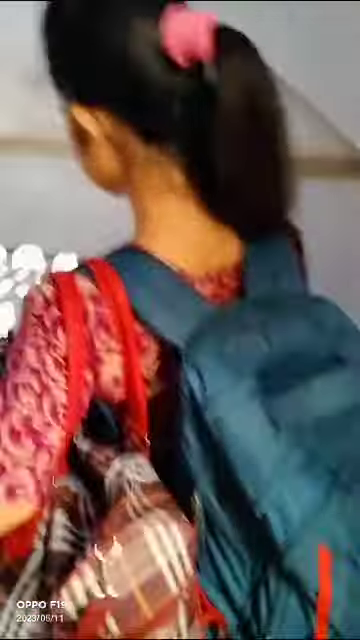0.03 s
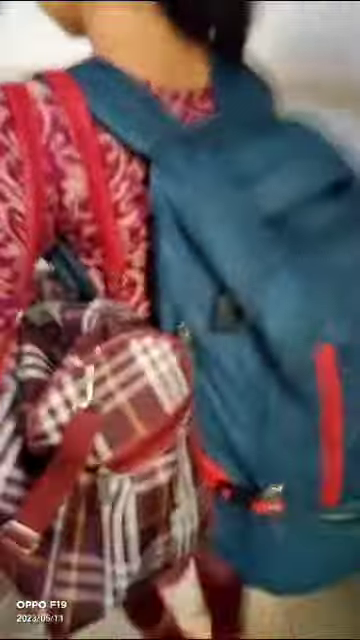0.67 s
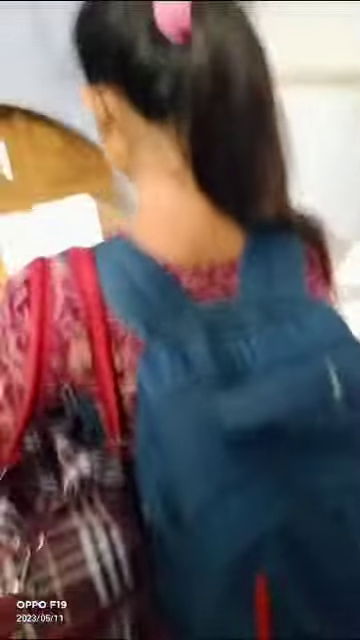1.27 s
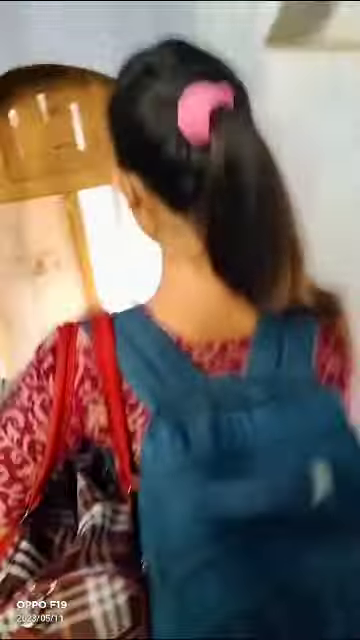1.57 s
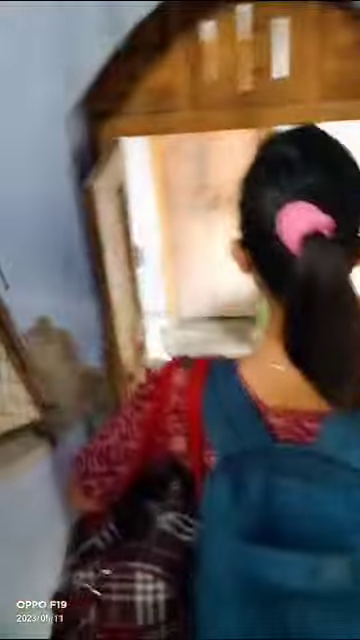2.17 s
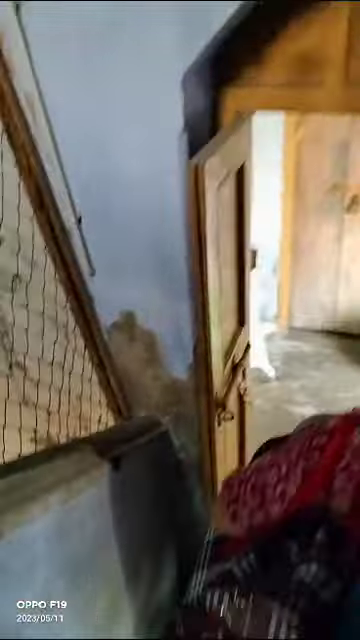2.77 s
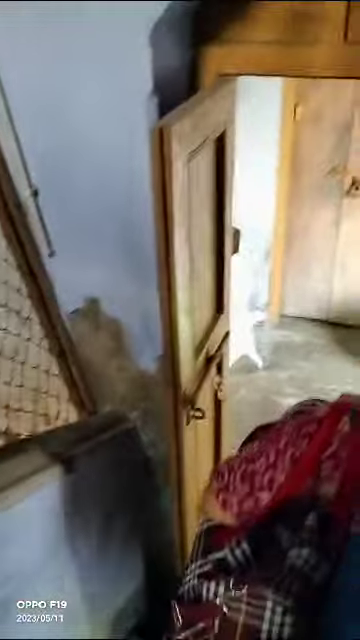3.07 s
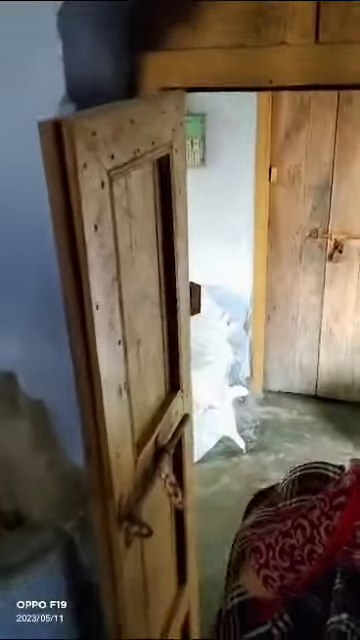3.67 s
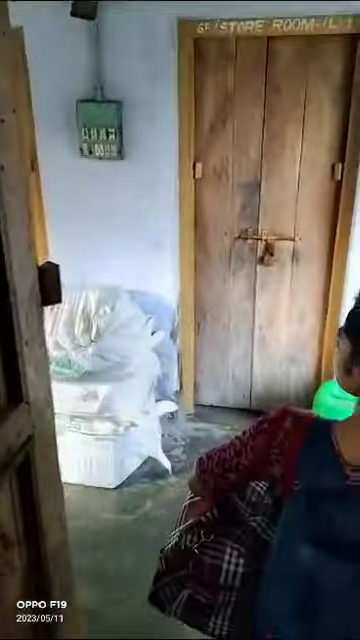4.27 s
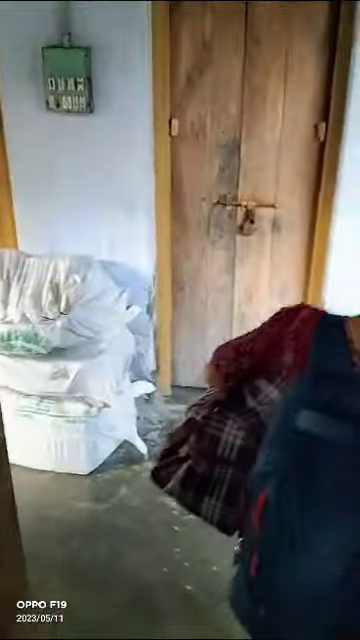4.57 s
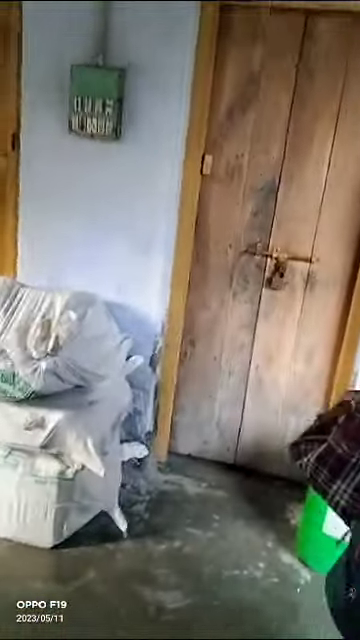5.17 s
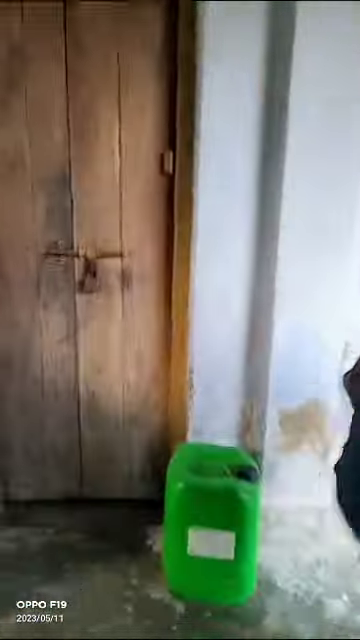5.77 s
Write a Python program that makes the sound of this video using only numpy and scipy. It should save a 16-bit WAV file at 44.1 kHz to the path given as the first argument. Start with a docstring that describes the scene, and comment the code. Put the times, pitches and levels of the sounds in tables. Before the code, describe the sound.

Footsteps of several people in flat sandals ring along a bare corridor, with hollow clops, gritty scrapes and nylon rustling close by.

```python
"""Heels knock on concrete as a few people in flat sandals walk along a bare plastered corridor.
Loose soles slap, some landings give a hollow clop, grit scuffs underfoot, and the walls ring on.
Close to the hand-held microphone, nylon clothes and bags rustle and the hand gives an odd bump.
Faint chirps, a brief hum and one soft swish sit over the low air of the building."""
import sys
import numpy as np
from scipy import signal
from scipy.fft import rfft, irfft, next_fast_len
from scipy.io import wavfile
from scipy.ndimage import uniform_filter1d

SR = 44100
rng = np.random.default_rng(int(sys.argv[2]) if len(sys.argv) > 2 else 0)


def store_pcm(level_fs):
    """Save levels as 16-bit WAV."""
    pcm = np.round(np.clip(level_fs, -1, 1) * 32767).astype(np.int16)
    wavfile.write(sys.argv[1], SR, np.atleast_2d(pcm).T)


N = 265173
TIME = np.arange(N) / SR
CONTACT = 2 ** 15   # samples in one contact and its echo
LOCAL = TIME[:CONTACT]
# echo at the microphone, thinning as the walkers leave by the doorway: t/s, level/dB
ECHO_DB = [(0, -2.5), (1.3, -2.5), (2.15, -1.5), (2.7, -8), (3.4, -8), (4.4, -7), (6, -10)]


def from_db(db):
    """Decibels to gain."""
    return 10 ** (np.asarray(db) / 20)


def rms_one(x):
    """Scale to unit rms."""
    return x / np.sqrt(np.mean(x ** 2) + 1e-20)


def along(curve, s):
    """Read a curve at a time."""
    return np.interp(s, *np.transpose(curve))


def at_hz(points, hz):
    """Read a table on a log-frequency axis."""
    f, value = np.transpose(points)
    return np.interp(np.log(hz + 1), np.log(f), value)


def bins(size):
    """Frequencies of a spectrum."""
    return np.arange(size // 2 + 1) * SR / size


def add(out, s, x):
    """Mix a sound in at a time."""
    i = max(0, round(s * SR))
    out[i:i + len(x)] += x[:max(0, N - i)]


def colour(x, gain_db):
    """Causal (minimum-phase) filter with the given gain in each bin."""
    cepstrum = irfft(np.log(from_db(gain_db)), len(x))
    cepstrum[1:len(x) // 2] *= 2
    cepstrum[len(x) // 2 + 1:] = 0
    return irfft(rfft(x) * np.exp(rfft(cepstrum)), len(x))


def shaped(x, spectrum):
    """Give a long noise a spectrum; rms 1."""
    size = next_fast_len(N)
    return rms_one(irfft(rfft(x, size) * from_db(at_hz(spectrum, bins(size))), size)[:N])


def grains(size, spread_db):
    """Noise whose samples differ widely in size, like grit."""
    noise = rng.standard_normal(size)
    return rms_one(noise * from_db(spread_db * np.clip(rng.standard_normal(size), -2, 2)))


def clumped(spread_db, clump_db):
    """Grains that come in bunches a few milliseconds long."""
    bunches = rms_one(uniform_filter1d(rng.standard_normal(N), size=180))
    return grains(N, spread_db) * from_db(clump_db * np.clip(bunches, -2, 2))


def narrow(hz, width_hz):
    """Noise in a narrow band about a steady or moving pitch; rms 1."""
    slow = signal.butter(2, width_hz / 2, fs=SR, output="sos")
    wobble = signal.sosfilt(slow, rng.standard_normal((2, N)))
    phase = 2 * np.pi * np.cumsum(hz * np.ones(N)) / SR
    return rms_one(wobble[0] * np.cos(phase) + wobble[1] * np.sin(phase))


def decay(t60):
    """A level that falls 60 dB in t60 seconds."""
    return np.exp(-np.log(1000) * LOCAL / t60)


def swell(s, db, half_s):
    """A bell-shaped rise and fall of level."""
    return from_db(db) * np.exp(-((TIME - s) / half_s) ** 2)


def stroke(since, db, fade_s, rise_share):
    """Level of a rub that swells and then dies away; a slow rub also swells slowly."""
    return from_db(db) * np.exp(-np.where(since < 0, (since / (rise_share * fade_s)) ** 2, since / fade_s))


def flex(hz):
    """A sole bends differently each time: new resonances, wider and shallower in the treble (dB)."""
    knots_hz = np.arange(0, 150, 1.2) ** 2
    depth_db = at_hz([(1200, 4.8), (3500, 3.6)], hz)
    return depth_db * np.interp(hz, knots_hz, np.clip(rng.standard_normal(len(knots_hz)), -1.7, 1.6))


def corridor(lump_db=0.5, build_s=0.0034):
    """The corridor heard from one spot: wall echoes merge into a tail, the bass lasting longest."""
    # what the plaster gives back: f/Hz, level/dB
    walls = [(150, 5), (400, -0.5), (1100, 4), (3000, 1), (5500, 2), (8000, -3.5), (14000, 6)]
    # reverberation time: f/Hz, t60/s
    ring_times = [(200, 0.84), (600, 0.53), (1300, 0.35), (3200, 0.33), (5500, 0.28), (8000, 0.38),
                  (14000, 0.23)]
    hz = bins(CONTACT)
    lumps = np.repeat(rng.standard_normal(CONTACT // 32), 32)
    echoes = from_db(lump_db * np.clip(lumps - .4, -2, 1.6) * np.exp(-LOCAL / 0.032))
    spectrum = rfft(rng.standard_normal(CONTACT) * echoes) * from_db(at_hz(walls, hz))
    centres, t60s = np.transpose(ring_times)
    tail = 0
    for share, t60 in zip(np.eye(len(centres)), t60s):
        band = irfft(spectrum * at_hz(np.c_[centres, share], hz))
        tail = tail + band * decay(t60)
    return tail * (1 - np.exp(-LOCAL / build_s))


def standing_waves(x, trim_db=-1.5):
    """The corridor lifts a fixed set of pitches."""
    # resonances between the walls: f/Hz, width/Hz, lift/dB
    room_modes = [(138, 18, 3), (205, 35, 3), (254, 36, 4), (385, 26, 6), (480, 40, 6), (640, 50, 3),
                  (760, 60, 3), (1165, 50, 4), (2920, 90, 3), (3473, 70, 3), (4050, 300, 3), (5134, 110, 4),
                  (6692, 190, 3)]
    size = next_fast_len(N + CONTACT, real=True) * 2
    lift_db = sum(db / (1 + (2 * (bins(size) - hz) / width) ** 2) for hz, width, db in room_modes)
    return colour(np.pad(x, (0, size - N)), lift_db + trim_db)[:N]


def sole(level_db, tint_db, wet_db, smack_db, crack_db, early_db, crack_s, early_s):
    """A sole smacks, crackles as its edges close, echoes off floor and legs, then fills the corridor."""
    # a sole on concrete: f/Hz, level/dB
    spectrum = [(80, -36), (150, -15), (250, -8), (650, -5.5), (1150, -4), (1900, -4), (2900, 0.5),
                (3900, -2.5), (4700, -8), (7000, -13), (8200, -18), (9200, -36.5), (12000, -39.5),
                (15500, -48)]
    # where the body, knock, slap and snap of tint_db lie: f/Hz
    tint_hz = [330, 1100, 3700, 7000]
    hz = bins(CONTACT)
    tint = at_hz(np.c_[tint_hz, tint_db], hz) * np.minimum(hz / 200, 1)
    gain_db = at_hz(spectrum, hz) + tint + flex(hz)
    gain_db -= 10 * np.log10(np.mean(from_db(gain_db) ** 2))
    # a light touch rolls on to the floor, so less of it arrives in the first smack
    firm_db, softening = -24, 0.35
    flatness = from_db(softening * min(level_db - firm_db, 0))
    smack = flatness * from_db(smack_db) * rms_one(signal.unit_impulse(CONTACT, round(.0006 * SR)))
    crack = flatness * from_db(crack_db) * rms_one(rng.standard_normal(CONTACT) * np.exp(-LOCAL / crack_s))
    early_echoes = grains(CONTACT, spread_db=9) * LOCAL * np.exp(-2 * LOCAL / early_s)
    early = from_db(early_db) * rms_one(early_echoes)
    blow = np.sqrt(.01 * SR / CONTACT)   # scales unit rms to the energy of 10 ms
    contact = blow * (smack + crack + early) + from_db(wet_db) * corridor()
    return from_db(level_db) * colour(contact, gain_db)


def footfalls(usual_db=-40.5, firm_db=-39, hollow_db=12.5, toe_lag_s=0.059, clear_s=.09):
    """Heels knock on the concrete; the forefoot follows a firm landing that the next does not crowd."""
    # heels landing: t/s, level/dB, hollow knock/dB, snap/dB
    heels = [(0.0, -46, 9, -6), (0.059, -54, -6, -4), (0.3775, -38.5, 11, -2), (0.4574, -40.5, -1, -30),
             (0.5562, -47.5, 20, 10), (1.046, -39.5, 5, 5.5), (1.0634, -38.5, 7, -7), (1.5351, -34, 3, 2),
             (1.703, -46.5, 11, -8), (2.1096, -36, 16, -4), (2.1425, -36.5, 11, 1.5),
             (2.3008, -49.5, 0, -3), (2.352, -51, 19, 14), (2.4042, -57.5, -26, 5), (2.638, -43.5, -2, 5.5),
             (2.6499, -33, 19.5, -38), (2.6606, -37.5, 3, -26), (2.7124, -38, 8.5, -35),
             (2.8289, -52.5, 11, 10), (3.2445, -39.5, 14, 12.5), (3.338, -41.5, 3, 6),
             (3.365, -38.5, 4.5, 0), (3.412, -35.5, 12.5, -7), (3.8624, -38, 8.5, -2.5),
             (3.8743, -37.5, 7, -1.5), (3.8973, -38.5, -6, -8), (3.934, -36.5, 30.5, 11),
             (4.1494, -46.5, 6.5, -11), (4.3506, -46.5, 8.5, -2), (4.3781, -41, 12.5, -23),
             (4.4296, -38, 30, -2.5), (4.472, -45, 13, 2), (4.6018, -50.5, 13.5, 11), (4.732, -52.5, 9, 1),
             (5.0738, -37.5, 14, 3), (5.0773, -32, 16, -3.5), (5.5648, -36.5, 2, -4),
             (5.5726, -25.5, 11, -1.5), (5.835, -45, 12, 9.5)]
    out = np.zeros(N)
    lags = toe_lag_s * (1 + 0.1 * rng.uniform(-0.83, 1, len(heels)))
    gaps = np.diff(np.array(heels)[:, 0], append=np.inf)
    for (s, level_db, knock_db, snap_db), lag, gap in zip(heels, lags, gaps):
        # hollow and gentle landings have more body
        body_db = -3.5 + 0.74 * knock_db - 0.76 * (level_db - usual_db)
        # a very hollow knock sends less into the room
        wet_db = 0.62 + along(ECHO_DB, s) - 0.48 * max(knock_db - hollow_db, 0)
        smack_db = -3 - 0.55 * wet_db   # a heel heard mostly by its echo has little first smack
        touches = [(s, level_db, snap_db)]
        if level_db > firm_db and gap > clear_s:
            touches.append((s + lag, level_db - 14, snap_db - 3))   # forefoot: softer and duller
        for when, touch_db, edge_db in touches:
            add(out, when, sole(touch_db, [body_db, knock_db, 0, edge_db], wet_db, smack_db,
                                crack_db=-1.3, early_db=-2.5, crack_s=0.00024, early_s=0.0098))
    return out


def building_air():
    """Room tone all round the microphone: a low rush that drifts in level."""
    # air of the building: f/Hz, level/dB
    spectrum = [(80, -1.5), (150, -3), (250, 2), (480, 0.5), (700, -0.5), (1150, -0.5), (1900, -7),
                (2900, -6.5), (3900, -7), (4700, -10.5), (7300, -16), (9400, -34), (12000, -35.5),
                (15500, -32)]
    # its drift: t/s, level/dB
    drift = [(0, -60.5), (.8, -63), (1.35, -63), (1.8, -58), (2.5, -63.5), (2.95, -66), (3.5, -60.5),
             (4.2, -63), (5.45, -64), (6, -58)]
    rumble_cut = signal.butter(2, 40, "high", fs=SR, output="sos")
    air = signal.sosfilt(rumble_cut, shaped(rng.standard_normal(N), spectrum))
    return air * from_db(along(drift, TIME))


def sandal_slaps():
    """A loose sandal slaps once a stride: thin, sharp cracks that set the corridor ringing."""
    # slaps about 0.54 s apart: t/s, level/dB, body/dB, knock/dB, snap/dB, echo/dB
    slaps = [(0.4039, -33.5, 0.5, -10.5, 2.5, 0), (0.9157, -32, -5.5, -8, 2, -0.5),
             (1.4531, -37, -7.5, -5.5, -2.5, 1), (2.023, -31.5, -3.5, -9, 2, 0.5),
             (2.526, -36, -5.5, -9.5, -5.5, -2), (3.0641, -31, -14, -7.5, -4, 0.5),
             (3.6368, -30, -13.5, -11, -2, -4.5)]
    out = np.zeros(N)
    for s, level_db, body_db, knock_db, snap_db, wet_db in slaps:
        add(out, s, sole(level_db, [body_db, knock_db, 0, snap_db], wet_db,
                         smack_db=1, crack_db=-1.5, early_db=-5.5, crack_s=.0004, early_s=.009))
    return out


def microphone_bumps(swell_s=0.0036, lag_s=0.0094):
    """Handling noise: a jolt of the hand gives a cycle or two of deep thud."""
    # jolts on the microphone: t/s, level/dB, f/Hz
    jolts = [(.41, -52, 70), (1.684, -49, 121), (1.921, -52.5, 79.6), (2.015, -54, 85), (2.694, -38.5, 61),
             (4.561, -50.5, 63), (5.057, -46.5, 94)]
    out = np.zeros(N)
    envelope = (LOCAL / swell_s / 2) ** 2 * np.exp(2 - LOCAL / swell_s)
    for s, db, hz in jolts:
        add(out, s + lag_s, from_db(db) * envelope * np.sin(2 * np.pi * hz * LOCAL))
    return out


def chirps():
    """Faint, thin chirps: short swells of one high band of noise."""
    # crests of the chirps: t/s, level/dB
    crests = [(0.742, -62.5), (1.341, -64.5), (1.81, -68.5), (3.505, -66)]
    return sum(swell(s, db, half_s=0.017) for s, db in crests) * narrow(hz=7770, width_hz=74)


def clops(span_octaves=0.76, low_hz=210, dull_hz=1750, ring_db=-6.5, puff_db=-11, attack_s=.0015):
    """A soft, hollow landing: a brief puff and a few low modes, favoured near the blow's own pitch."""
    # hollow knocks: t/s, level/dB, pitch/Hz
    knocks = [(.996, -31.5, 345), (1.508, -31, 860), (2.088, -26.5, 354), (4.9593, -25, 1250),
              (4.9674, -19, 430), (4.9747, -23.5, 520), (5.3032, -36.5, 1330), (5.3106, -30, 1090),
              (5.715, -35, 990)]
    # ring of a knock: f/Hz, level/dB, t60/s
    modes = [(238, 2, 0.036), (469, -1, 0.19), (520, -21.5, 0.39), (635, 6, 0.033), (727, -0.5, 0.024),
             (904, -2.5, 0.16), (1057, 1, 0.071), (1390, 2.5, 0.037), (1625, -8, 0.051)]
    out = np.zeros(N)
    soften = np.vstack([signal.butter(12, dull_hz, fs=SR, output="sos"),
                        signal.butter(4, low_hz, "high", fs=SR, output="sos")])
    attack = 1 - np.exp(-LOCAL / attack_s)

    def drive(hz, pitch_hz):
        """How strongly a blow excites each frequency."""
        return np.exp(-(np.log2((hz + 1) / pitch_hz) / span_octaves) ** 2) + 0.24

    for s, level_db, pitch_hz in knocks:
        ring = sum((-1) ** k * from_db(db) * drive(f, pitch_hz) * np.sin(2 * np.pi * f * LOCAL) * decay(t60)
                   for k, (f, db, t60) in enumerate(modes))
        puff = from_db(puff_db) * rng.standard_normal(CONTACT) * np.exp(-LOCAL / .004)
        echo = from_db(-8 + 1.5 * along(ECHO_DB, s)) * corridor()
        drive_db = 20 * np.log10(rms_one(drive(bins(CONTACT), pitch_hz)))
        clop = from_db(ring_db) * ring + colour(puff + echo, drive_db)
        add(out, s, from_db(level_db) * signal.sosfilt(soften, clop * attack))
    return out


def hum():
    """A brief low hum: two wavering tones that overlap."""
    # crests of the tones: t/s, level/dB, f/Hz
    tones = [(1.664, -58.5, 136), (1.752, -60.5, 232.7)]
    return sum(swell(s, db, half_s=0.11) * narrow(hz, width_hz=7.4) for s, db, hz in tones)


def swish(peak_s=2.0, peak_db=-54, rise_s=0.4, fade_s=0.15, peak_hz=1580, hz_per_s=1400):
    """A soft swish swells ahead of a stride and rises in pitch."""
    since = TIME - peak_s
    level = from_db(peak_db) * np.exp(np.minimum(since / rise_s, -since / fade_s))
    return level * narrow(peak_hz + hz_per_s * since, width_hz=450)


def nylon_rustle(rest_db=-96):
    """Nylon rubs close to the microphone in short clumps of fine crackle."""
    # bags and straps rubbing: t/s, level/dB, fade/s
    rubs = [(1.96, -75, 0.043), (2.39, -71, 0.023), (2.85, -63, 0.023), (3.168, -46.5, 0.01),
            (3.26, -60, 0.06), (3.31, -63, 0.03), (3.398, -61, 0.017), (3.6, -68, .015), (4.32, -76, .015),
            (5.19, -56.5, 0.024), (5.527, -65, 0.027)]
    # nylon crackle: f/Hz, level/dB
    spectrum = [(1000, -37), (4000, 0), (7500, 5), (9400, -5.5), (10800, -7), (11900, 15.5), (13300, -9),
                (15000, 16), (16000, -13)]
    level = sum(stroke(TIME - s, db, fade_s, rise_share=0.54) for s, db, fade_s in rubs)
    return shaped(clumped(spread_db=22, clump_db=4), spectrum) * (level + from_db(rest_db))


def scuffs(wet_db=-4, trim_db=-0.5, low_cut_hz=110, lead_s=.25):
    """Grit rolls under a dragged sole, bent differently each time, and the corridor answers."""
    # soles dragging: t/s, level/dB, fade/s
    drags = [(2.76, -53.5, 0.058), (3.6, -55.5, 0.07), (4.003, -43, 0.026), (5.035, -49.5, 0.067),
             (5.16, -38.5, 0.028), (5.522, -40.5, .018)]
    # grit on concrete: f/Hz, level/dB
    spectrum = [(150, -11), (500, -12), (1100, -2.5), (1900, -1), (3000, 0.5), (4800, -4), (7000, -9.5),
                (8100, -13), (9400, -30.5), (12000, -31), (15500, -33)]
    grit = shaped(clumped(spread_db=6, clump_db=2.5), spectrum)
    direct = np.zeros(N)
    for k, (s, db, fade_s) in enumerate(drags):
        rub = grit[k * CONTACT:(k + 1) * CONTACT] * stroke(LOCAL - lead_s, db, fade_s, rise_share=0.61)
        add(direct, s - lead_s, colour(rub, flex(bins(CONTACT)) + trim_db))
    direct = signal.sosfilt(signal.butter(2, low_cut_hz, "high", fs=SR, output="sos"), direct)
    room = corridor()
    return direct + from_db(wet_db) * signal.fftconvolve(direct, room / np.linalg.norm(room))[:N]


def scene():
    """One hand-held microphone in the corridor: steps along the floor, rustle and bumps close up."""
    walk = standing_waves(sandal_slaps() + footfalls() + scuffs() + building_air()) + clops()
    close_up = nylon_rustle() + microphone_bumps()
    return (walk + close_up + chirps() + hum() + swish())[None]


def record(dry):
    """The recorder cuts steeply above 16.4 kHz."""
    return signal.sosfilt(signal.ellip(10, .2, 70, 16400, fs=SR, output="sos"), dry)


dry = scene()
out = record(dry)
store_pcm(out)
```